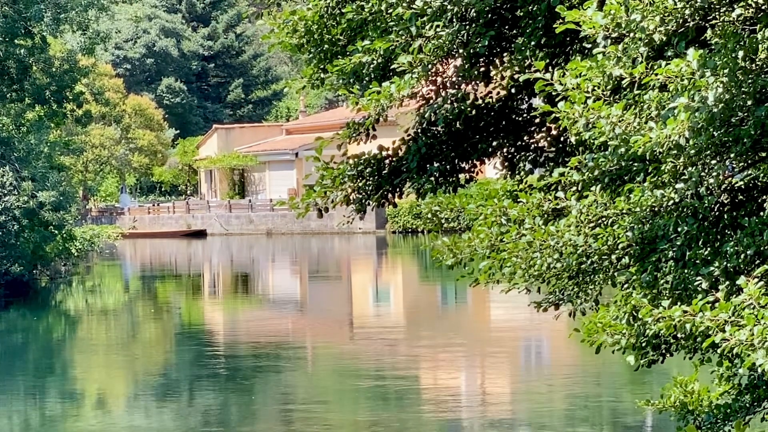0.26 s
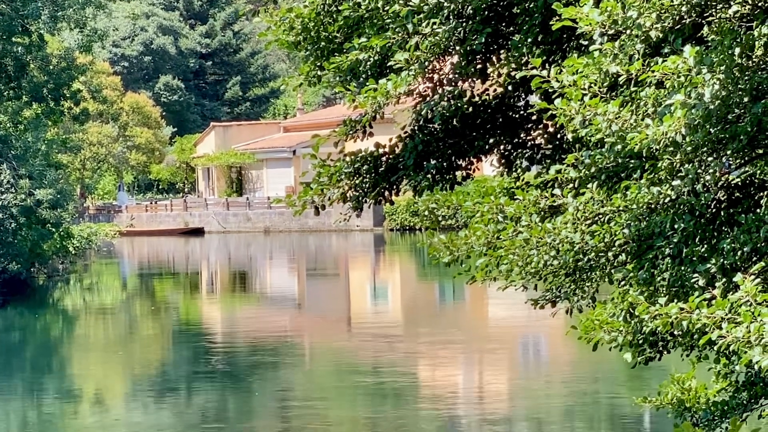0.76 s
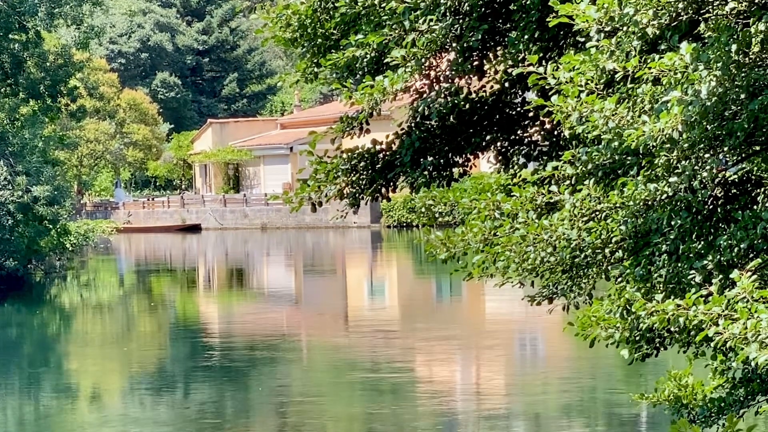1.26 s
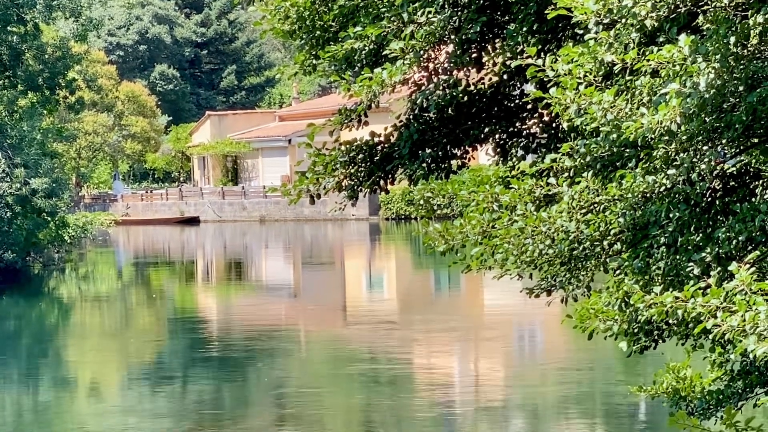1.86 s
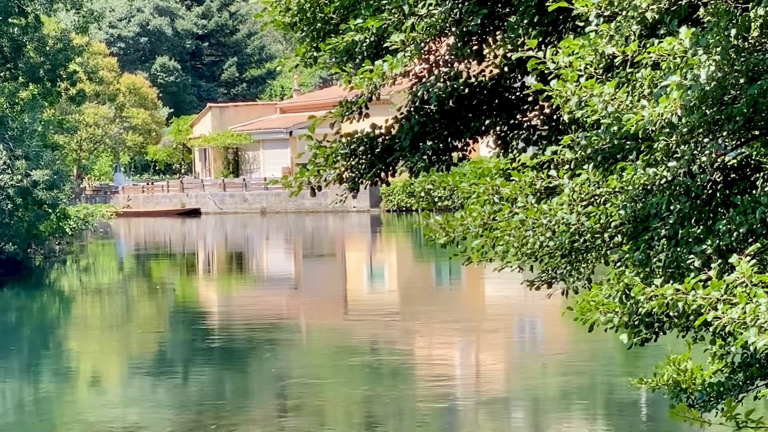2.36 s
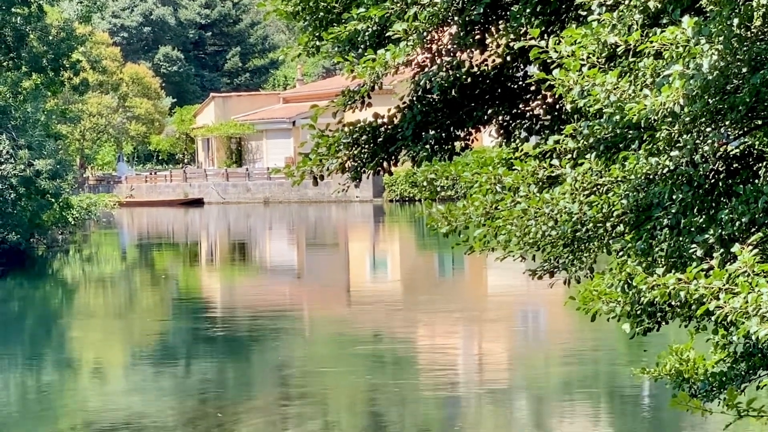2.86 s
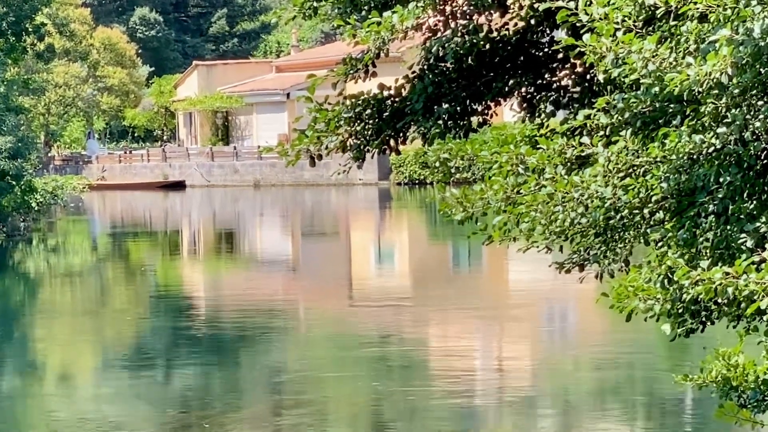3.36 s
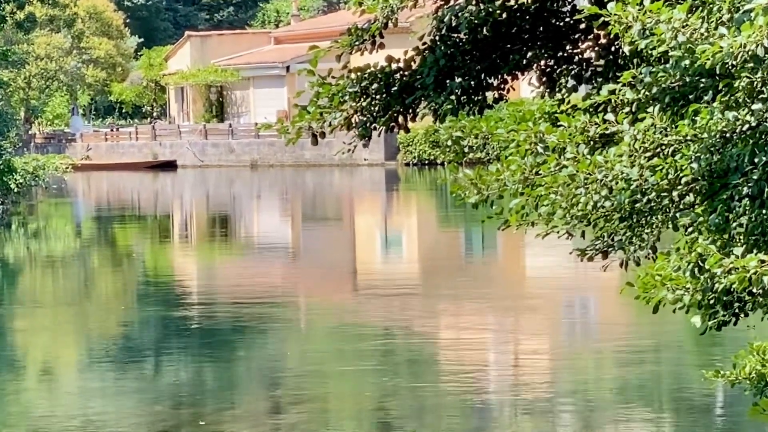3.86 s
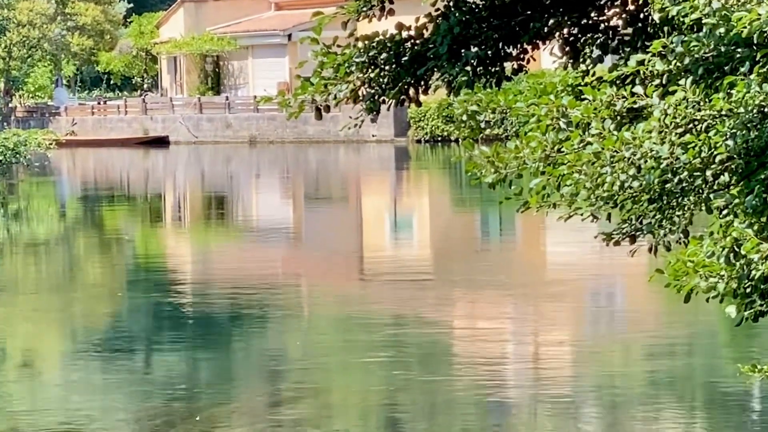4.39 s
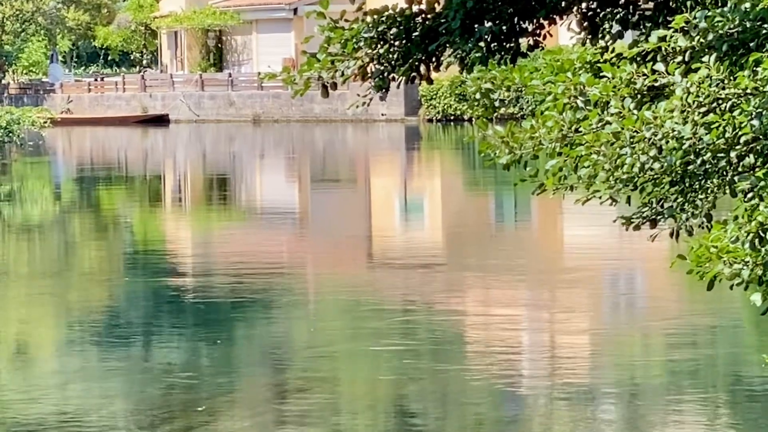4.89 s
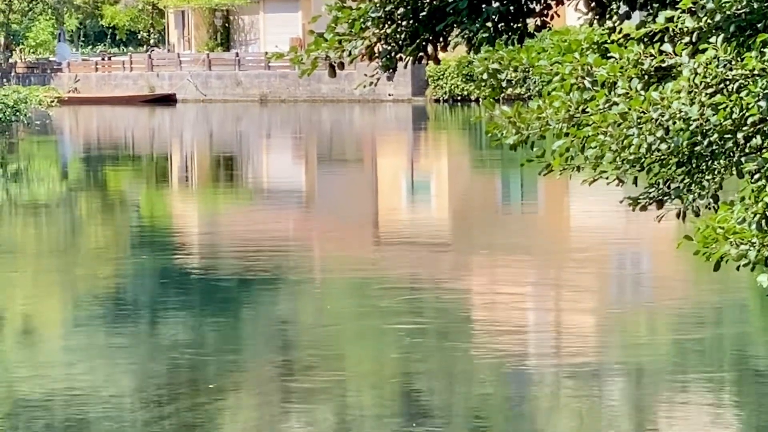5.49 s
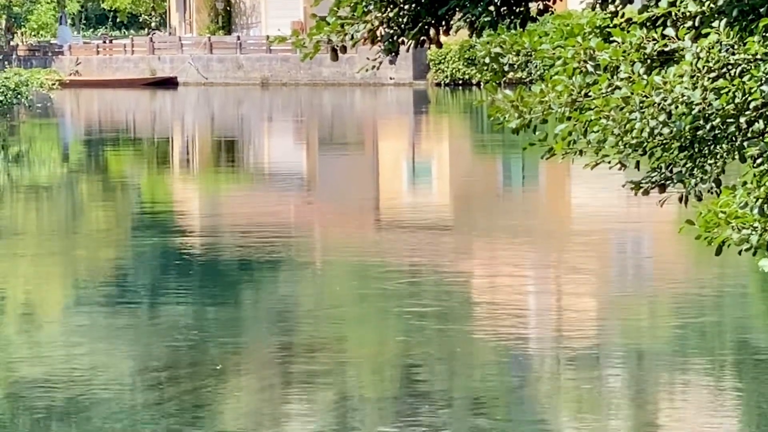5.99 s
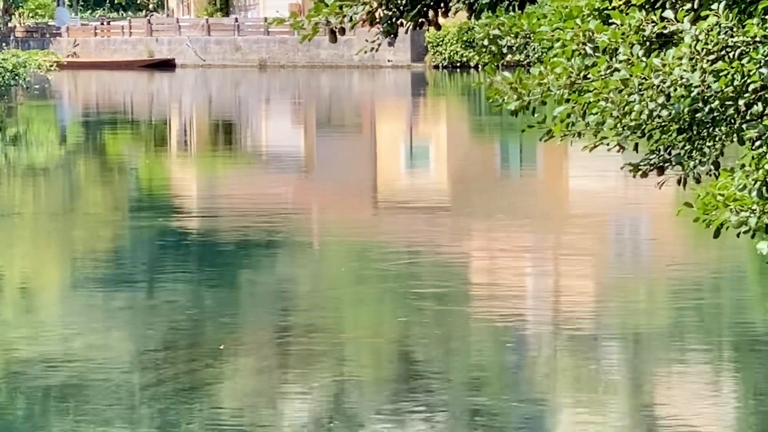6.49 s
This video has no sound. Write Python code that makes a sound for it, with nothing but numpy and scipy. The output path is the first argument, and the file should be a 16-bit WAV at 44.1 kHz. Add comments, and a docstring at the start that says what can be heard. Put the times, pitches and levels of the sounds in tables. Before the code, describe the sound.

A warm open-air river bank with trees, heard in stereo by two close microphones. From 0 to about 6.7 seconds cicadas rasp continuously: a near one chirps roughly seven times a second, slightly uneven, bright and dry around 4 to 8 kHz, with a duller one in step, throbbing neighbours and a hissing far chorus. Beneath lies soft, wide water noise. From the start a distant engine drones low under throttle, rising slightly until about 2.7 seconds and beating against a steadier second engine, with far tyre rush. Thin, short bird chips around 3 kHz appear between 0.2 and 1.4 seconds; a faint engine whine, clearest near 0.5 seconds, is gone by 2. By 3 seconds the throttle has eased; the drone turns duller and sinks steadily in pitch, most clearly after 4 seconds. Tyre rush swells briefly near 3.4, then fades. Rumble and cicadas continue to the end.

```python
"""Cicadas rasp in trees along a river throughout: a close one chirps about seven times a second over a far chorus.
From the start a distant engine drones under throttle, beating against a steadier one, over river and tyre noise.
A small bird chips in the first second and a half; a thin engine whine is gone by about two seconds.
By three seconds the throttle has eased and the drone sinks in pitch to the end; the tyre rush fades late.
Clicks make the near cicadas, harmonics the engines, shaped noise the rest; two close microphone ports hear it."""
import sys
import numpy as np
from scipy import signal
from scipy.fft import rfft, irfft
from scipy.io import wavfile

SR = 44100
rng = np.random.default_rng(int(sys.argv[2]) if len(sys.argv) > 2 else 0)


def dump_mix(stems):
    """Bounce the given channels to the path in sys.argv[1] as a 16-bit WAV at rate SR."""
    frames = np.atleast_2d(stems).T  # one column per channel
    limited = np.clip(frames, -1, 1)  # hard clip at full scale
    pcm = np.round(limited * 32767).astype(np.int16)
    wavfile.write(sys.argv[1], SR, pcm)


N = 297234
TIME = np.arange(N) / SR
HZ = np.fft.rfftfreq(N, 1 / SR)


def gain_of(db):
    """Decibels to amplitude."""
    return 10 ** (np.asarray(db) / 20)


def evened(x):
    """Scales to rms 1."""
    return x / np.sqrt(np.mean(x ** 2) + 1e-20)


def curve(rows):
    """A time table at every sample."""
    return np.interp(TIME, *np.transpose(rows))


def read(points):
    """A frequency table at every bin, on a log axis."""
    f, value = np.transpose(points)
    return np.interp(np.log(HZ + 1), np.log(f), value)


def drift(rate_hz, size=16384):
    """Slow chance of rms 1, up to about rate_hz."""
    hz = np.fft.rfftfreq(size, TIME[-1] / size)
    spectrum = rfft(rng.standard_normal(size))
    slow = irfft(spectrum / (1 + (hz / rate_hz) ** 4))
    return evened(np.interp(TIME, np.linspace(0, TIME[-1], size), slow))


def white_pair():
    """Two unrelated white noises."""
    return rng.standard_normal((2, N))


def ports(pair, colour, likeness, lead_rad=0):
    """Colours two unrelated signals and blends them into what the left and right ports hear, rms 1."""
    a, b = rfft(pair) * gain_of(read(colour))
    same = np.clip(read(likeness), 0, 1)
    blend = same * a + np.sqrt(1 - same ** 2) * b
    right = blend * np.exp(-1j * lead_rad)
    return evened(irfft(np.array([a, right]), N))


def foliage(x, t60_s, direct, count=6):
    """A direct path plus scatter from swaying leaves, its echo pattern always changing; two copies."""
    t = TIME[:SR // 3]
    tails = rng.standard_normal((count, 2, len(t))) * 10 ** (-3 * t / t60_s)
    tails /= np.linalg.norm(tails, axis=2, keepdims=True)
    shares = np.array([drift(4.8) for _ in tails])
    shares /= np.linalg.norm(shares, axis=0)
    out = np.zeros((2, N))
    for share, tail in zip(shares, tails):
        out += signal.oaconvolve((x * share)[None], tail, axes=1)[:, :N]
    # only the first copy holds the direct path
    return np.array([evened(out[0] + direct * x), evened(out[1])])


def tymbals(effort, clicks_hz, jitter, rasp_db, rasp_hz):
    """A quick, uneven run of clicks from buckling ribs, as strong as the effort and bunched into a rasp."""
    turns = np.cumsum(clicks_hz * (1 + jitter * drift(200))) / SR
    clicks = np.diff(np.floor(turns), prepend=0)
    return effort * gain_of(rasp_db * drift(rasp_hz)) * clicks


# Likeness of the ports. Each row: frequency in Hz, likeness 0-1.
CICADA_LIKENESS = [(1800, .5), (2300, .74), (2900, .99), (4000, .98), (5400, .9), (5770, .98), (6100, .89),
                   (7500, .83), (10500, .6), (11200, 1)]
# Phase lead of the left port. Each row: frequency in Hz, lead in radians.
CICADA_LEAD = [(2000, .5), (2500, -.05), (4000, -.05), (4350, -.5), (5550, -1.1), (5770, -3.1),
               (5880, -4.5), (6200, -6.2), (6900, -7.7), (8300, -8.6), (10700, -7.3), (11200, -2 * np.pi)]


def cicada_ports(pair, colour):
    """Stereo image of the cicadas: likeness and phase by frequency, the ports alike at the very top."""
    return ports(pair, colour, CICADA_LIKENESS, read(CICADA_LEAD))


# Close cicada, nearly even with a hitch now and then. Each row: mark in seconds, relative level in dB.
CHIRPS = [(.039, 0.5), (.2, 3.5), (.384, 4), (.565, 4.5), (.692, 1.5), (.846, 2.5), (.995, -0.5),
          (1.09, -6.5), (1.214, 0), (1.321, -1.5), (1.457, 2.5), (1.611, 4.5), (1.755, 2.5), (1.893, 0),
          (1.99, -2), (2.112, -0.5), (2.24, -0.5), (2.353, -1.5), (2.44, -4.5), (2.56, 1.5), (2.756, 3.5),
          (2.943, -0.5), (3.078, 1.5), (3.236, 2), (3.395, 2), (3.53, 2), (3.7, 2.5), (3.861, 0),
          (4.028, 1), (4.17, -2), (4.294, 3), (4.426, 1), (4.575, 2.5), (4.735, 1), (4.859, -0.5),
          (4.988, 1), (5.135, 0.5), (5.36, -1), (5.47, -4.5), (5.563, -3), (5.675, 1), (5.833, 2.5),
          (5.972, -1), (6.122, 2), (6.33, 3), (6.455, -2), (6.62, -1)]


def chirp_effort(rise_s, fall_s, lead_s):
    """About seven chirps a second, cresting lead_s before the mark, each dying away slower than it swells."""
    effort = np.zeros(N)
    for mark_s, db in CHIRPS:
        t = TIME - mark_s + lead_s
        width_s = np.where(t < 0, rise_s, fall_s)
        effort += gain_of(db) * np.exp(-np.minimum((t / width_s) ** 2, 20))
    return effort


# The nearest cicada loses least treble on its way. Each row: frequency in Hz, density in dB per Hz.
NEAR_COLOUR = [(1600, -32), (2250, -6.5), (3600, -8.5), (4400, 5), (5300, 1), (6200, 2), (7200, 3.5),
               (8400, -3), (10300, -9.5), (11200, -19.5), (12700, -15.5), (15000, -21)]


def close_cicada():
    """Tymbal clicks in chirps, a direct part within a stronger, short leaf scatter."""
    effort = chirp_effort(rise_s=0.037, fall_s=0.051, lead_s=0.01)
    clicks = tymbals(effort, clicks_hz=901, jitter=.3, rasp_db=0.8, rasp_hz=200)
    return gain_of(-59.5) * cicada_ports(foliage(clicks, t60_s=0.07, direct=0.72), NEAR_COLOUR)


# Colour of the duller chirps. Each row: frequency in Hz, density in dB per Hz.
DULLER_COLOUR = [(1700, -21), (2250, -6), (3000, -19), (3700, -21), (4300, 0), (4850, 2.5), (5100, -14),
                 (5450, 2.5), (7000, -20), (12000, -32)]


def duller_chirps():
    """A duller layer of the same chirps, in step with the close cicada: slower clicks, longer leaf scatter."""
    effort = chirp_effort(rise_s=0.042, fall_s=0.053, lead_s=0.015)
    clicks = tymbals(effort, clicks_hz=419.0, jitter=.4, rasp_db=2, rasp_hz=120)
    return gain_of(-60) * cicada_ports(foliage(clicks, t60_s=0.15, direct=1.0), DULLER_COLOUR)


# Neighbouring cicadas.
# Each row: ring in Hz, width in Hz, chirps per second, clicks per second, level in dB.
NEIGHBOURS = [(4347, 500, 5.1, 470, -62), (4685, 560, 4.7, 560, -59), (4910, 480, 12.5, 510, -60.5),
              (5400, 510, 5.4, 610, -63.5), (6380, 1200, 11, 530, -67)]
NEIGHBOUR_SWING_DB = 4


def neighbour(ring_hz, width_hz, chirps_per_s, clicks_hz, db):
    """One cicada's throbbing clicks, ringing in its hollow abdomen."""
    beat = np.cumsum(chirps_per_s * (1 + 0.202 * drift(3.03))) / SR + rng.random()
    effort = gain_of(NEIGHBOUR_SWING_DB * np.cos(2 * np.pi * beat))
    clicks = tymbals(effort, clicks_hz, jitter=.3, rasp_db=2, rasp_hz=90)
    ring = signal.iirpeak(ring_hz, ring_hz / width_hz, fs=SR)
    rung = signal.lfilter(*ring, signal.lfilter(*ring, clicks))
    return gain_of(db) * evened(rung)


def neighbours():
    """The neighbours summed, each at its own pitch and beat, scattered by leaves."""
    others = sum(neighbour(*row) for row in NEIGHBOURS)
    flat = [(1, 0)]
    return np.std(others) * cicada_ports(foliage(others, t60_s=.12, direct=1.0), flat)


# Chorus colour from tymbal and hollow abdomen. Each row: frequency in Hz, density in dB per Hz.
CHORUS_COLOUR = [(1500, -60), (1850, -20), (2300, -7), (2700, -13.8), (3100, -13.5), (3600, -19.5),
                 (4300, -4.5), (4750, -1.5), (5200, -2.5), (6200, -8.5), (7200, -7.2), (8300, -14),
                 (10200, -19.5), (13000, -32.5)]


def chorus():
    """Clicks of many cicadas merged into a hiss: shaped noise."""
    return gain_of(-52.0) * cicada_ports(white_pair(), CHORUS_COLOUR)


# Deeper-voiced, farther cicadas. Each row: frequency in Hz, density in dB per Hz.
DEEP_COLOUR = [(1600, -42), (2050, 0), (2400, -2.5), (2700, -0.5), (3000, -1), (3300, -5), (3700, -9),
               (4300, -34)]
# Each row: time in seconds, level in dB.
DEEP_DB = [(0, -68), (.5, -68), (.9, -66), (1.4, -69.5), (2, -69), (3, -70), (4.5, -71), (6.74, -69)]


def deep_chorus():
    """Lower-pitched shaped noise whose level wanders."""
    return gain_of(curve(DEEP_DB)) * cicada_ports(white_pair(), DEEP_COLOUR)


def cicadas():
    """All singers, close and far."""
    return close_cicada() + duller_chirps() + neighbours() + chorus() + deep_chorus()


def exhaust(firing_hz, levels_db, waver_rad, flutter_db, smear_rad):
    """One puff per firing, as harmonics nearly in step; moving air shakes their phase and strength."""
    turns = np.cumsum(firing_hz) / SR + rng.random()
    out = np.zeros(N)
    for order, db in enumerate(levels_db, 2):
        offset = smear_rad * rng.standard_normal() + waver_rad * drift(8.0)
        phase = 2 * np.pi * order * turns + offset
        out -= np.sqrt(2) * gain_of(db + flutter_db * drift(15.3)) * np.cos(phase)
    return out


# Single harmonics boom out or fade, several at times together.
# Each row: start in seconds, end in seconds, harmonic number, change in dB.
SWELLS = [(.12, 0.28, 3, 2.5), (.44, 0.623, 3, -3.5), (0.21, .62, 6, -8), (0.47, 0.77, 5, 1),
          (1.27, 2.04, 2, -7.5), (1.62, 3.05, 3, -5), (1.8, 1.99, 5, 4.5), (2.36, 2.926, 2, 5.5),
          (2.353, 2.8, 3, -5), (2.26, 2.67, 7, 5), (2.25, 2.65, 6, 5.5), (2.55, 3.12, 4, -7),
          (4.1, 4.36, 4, -14), (4.28, 4.6, 5, 6), (2.84, 3.24, 5, 4), (3.15, 3.5, 3, 8),
          (2.9, 3.35, 4, 6.5), (3, 3.46, 2, 5), (3.57, 3.777, 3, 8.5), (3.55, 4.097, 5, 6.5),
          (3.8, 4.077, 4, 6.5), (3.904, 3.99, 3, 9), (4.09, 4.236, 3, 7), (4.41, 4.53, 3, 4.5),
          (5.68, 7, 5, 13.5), (6.22, 6.6, 4, 5), (6.62, 7, 5, 7), (6.3, 7, 6, 9), (6.597, 7, 3, -6)]
SWELL_EDGE_S = 0.11


def swell(order):
    """One harmonic's change in dB, halfway at start and end; the briefest do not reach their full change."""
    change_db = np.zeros(N)
    for start_s, end_s, number, db in SWELLS:
        if round(number) == order:
            inside_s = np.minimum(TIME - start_s, end_s - TIME)
            change_db += db * np.clip(inside_s / SWELL_EDGE_S + .5, 0, 1)
    return change_db


# Engine speed. Each row: time in seconds, firings per second.
FIRING = [(0, 51.0), (.5, 52.4), (1.0, 53.8), (1.4, 54.5), (2.7, 55.0), (3.15, 54.0), (4.0, 51.4),
          (4.5, 48.2), (5.5, 41.2), (6.0, 38.3), (6.74, 35.7)]
# The driver eases off. Each row: time in seconds, throttle 0-1.
THROTTLE = [(0, 0.97), (.9, 0.92), (1.35, 0.75), (1.85, 0.64), (2.25, 0.29), (2.6, 0.45), (3, 0.07),
            (4.3, 0.29), (5.2, 0.05), (6.74, 0.1)]
# Harmonics from the second upward. Each row: level coasting in dB, level at full throttle in dB.
HARMONICS = [(-55.5, -44.5), (-48.5, -47), (-59.5, -47), (-65.5, -46.5), (-76.5, -52.5), (-75, -51)]


def drone():
    """Exhaust harmonics that brighten with throttle and follow the engine speed."""
    levels_db = []
    for order, (coasting_db, full_db) in enumerate(HARMONICS, 2):
        throttled_db = coasting_db + (full_db - coasting_db) * curve(THROTTLE)
        levels_db.append(throttled_db + swell(order))
    return exhaust(curve(FIRING), levels_db, waver_rad=0.2, flutter_db=1.2, smear_rad=0.81)


# Second engine's speed. Each row: time in seconds, firings per second.
SECOND_FIRING = [(0, 51.06), (3.0, 51.06), (4.0, 49.8), (5.2, 47)]
# Its harmonics from the second upward. Each entry: level in dB, before the time curve.
SECOND_HARMONICS_DB = [-53.5, -50, -57, -55, -61.5]
# Each row: time in seconds, level change in dB.
SECOND_DB = [(0, -2.5), (.65, -14), (.9, -2.5), (1.9, -1), (2.4, -8.5), (2.8, -11), (3.15, -2), (3.5, -6.5),
             (4.3, -21), (5.2, -20)]


def second_engine():
    """A steadier exhaust close in pitch, so that its harmonics beat with the drone's."""
    levels_db = [db + curve(SECOND_DB) for db in SECOND_HARMONICS_DB]
    return exhaust(curve(SECOND_FIRING), levels_db, waver_rad=0.35, flutter_db=2.0, smear_rad=1.94)


# Likeness of the ports for engine, river and tyre noise. Each row: frequency in Hz, likeness 0-1.
LOW_LIKENESS = [(100, 0.99), (350, 0.98), (540, 0.83), (780, 0.3), (1150, 0.05), (1700, 0.37), (3000, 1),
                (11000, 1)]
# Exhaust rumble. Each row: frequency in Hz, density in dB per Hz.
RUMBLE_COLOUR = [(20, -41), (31, -28), (38, -6), (45, -4), (60, 4), (76, 4.5), (120, -0.5), (180, 1),
                 (250, -12), (330, -19), (500, -47)]
# Each row: time in seconds, level in dB.
RUMBLE_DB = [(0, -48.5), (1.8, -49.5), (2.6, -47.5), (3.3, -48.5), (4.6, -48), (5.4, -47.5), (6.1, -46),
             (6.74, -45.5)]


def rumble():
    """Low shaped noise of the exhaust."""
    return gain_of(curve(RUMBLE_DB)) * ports(white_pair(), RUMBLE_COLOUR, LOW_LIKENESS)


# Gas roar. Each row: frequency in Hz, density in dB per Hz.
ROAR_COLOUR = [(100, -28), (170, -5), (240, 0), (330, -7), (420, -2.5), (600, -19), (1200, -46)]


def roar():
    """Gas roaring out of the exhaust: noise in proportion to throttle."""
    return gain_of(-58.5) * curve(THROTTLE) * ports(white_pair(), ROAR_COLOUR, LOW_LIKENESS)


THROB_HZ = 36
# Each row: time in seconds, level in dB.
THROB_DB = [(0, -59), (1.2, -57), (2.4, -60), (2.9, -58), (3.4, -65), (3.9, -54), (4.35, -57), (4.7, -68),
            (5.1, -59), (5.5, -66), (6.74, -73)]


def throb():
    """A low sine under the engines, its phase drifting."""
    phase = 2 * np.pi * THROB_HZ * TIME + 0.99 * drift(5.1)
    return np.sqrt(2) * gain_of(curve(THROB_DB)) * np.sin(phase)


def engine():
    """Both exhausts and the noise beneath, the right port ahead by one phase at every frequency."""
    lead_rad = 0.23
    left, right = drone() + second_engine() + rumble() + roar() + throb()
    return np.array([left, irfft(rfft(right) * np.exp(1j * lead_rad), N)])


# River and valley. Each row: frequency in Hz, density in dB per Hz.
RIVER_COLOUR = [(20, -23), (100, -20), (250, 0), (400, -1), (540, -1), (700, -5), (1000, -8), (1300, -14),
                (1700, -20), (3000, -30), (8000, -43), (15000, -69)]


def river():
    """Soft, wide water noise with a slightly wandering level."""
    level_db = -56.5 + 0.64 * drift(11.5)
    return gain_of(level_db) * ports(white_pair(), RIVER_COLOUR, LOW_LIKENESS)


# Far tyres. Each row: frequency in Hz, density in dB per Hz.
TYRE_COLOUR = [(200, -2.5), (500, -9), (900, 1), (1200, -2), (1700, -13.5), (3000, -39), (8000, -58)]
# Each row: time in seconds, level in dB.
TYRE_DB = [(0, -65.5), (.7, -63), (1.4, -64.5), (2.3, -63), (3, -66.5), (3.38, -61.5), (3.7, -66.5),
           (4.5, -71.5), (6.74, -72)]


def tyres():
    """A far rush of shaped noise, fading late."""
    return gain_of(curve(TYRE_DB)) * ports(white_pair(), TYRE_COLOUR, LOW_LIKENESS)


WHINE_ORDER = 17  # multiple of the firing rate
# Each row: time in seconds, peak level in dB.
WHINE_DB = [(.1, -72), (.33, -67), (.42, -61), (.7, -60.5), (.77, -67), (1.1, -67), (1.2, -74), (1.8, -75),
            (2.1, -100)]


def whine():
    """A thin engine tone locked to its speed, its phase drifting separately at each port."""
    phase = 2 * np.pi * WHINE_ORDER * np.cumsum(curve(FIRING)) / SR
    tones = np.array([np.sin(phase + 0.57 * drift(17)) for _ in range(2)])
    return tones * gain_of(curve(WHINE_DB))


# Bird notes.
# Each row: start in seconds, length in seconds, start in Hz, end in Hz, level in dB before the leaf scatter.
BIRD = [(.163, 0.046, 3530, 3360, -61.5), (.368, .028, 3070, 3055, -61), (0.41, 0.029, 3020, 3025, -61),
        (.752, .075, 3480, 3020, -61), (1.093, 0.084, 3110, 2990, -62), (1.165, .028, 3020, 3040, -63),
        (1.205, .036, 3020, 2975, -62), (1.32, .09, 3420, 3445, -64.5)]


def bird():
    """Thin, quavering whistles that glide quickly towards an end pitch, smeared by the trees."""
    song = np.zeros(N)
    for start_s, length_s, start_hz, end_hz, db in BIRD:
        u = np.clip((TIME - start_s) / length_s, 0, 1)
        glide_hz = end_hz + (start_hz - end_hz) * np.exp(-3.5 * u)
        hz = glide_hz + 15 * drift(71)
        envelope = np.sqrt(abs(np.sin(np.pi * u)))
        song += gain_of(db) * envelope * np.sin(2 * np.pi * np.cumsum(hz) / SR)
    return 1.23 * np.std(song) * foliage(song, t60_s=0.19, direct=2.2)[0]


def scene():
    """Everything heard from the river bank."""
    return cicadas() + engine() + river() + tyres() + whine() + bird()


# Recorder's treble roll-off. Each row: frequency in Hz, gain in dB.
ROLL_OFF = [(12800, 0), (13600, -1.5), (14300, -9), (15000, -8)]
# Colour difference of the ports. Each row: frequency in Hz, left minus right in dB.
PORT_BALANCE = [(60, 1.3), (99, 0.7), (160, 0.5), (270, 0.0), (440, -0.5), (730, 4), (1190, -3.5),
                (1970, 4.5), (3240, -1), (5330, 0.5), (8780, 0.0), (14400, 0)]


def record(dry):
    """The ports' colour, the recorder's soft top and its steep band limit."""
    eased = dry * signal.windows.tukey(N, .002)
    colour_db = read(ROLL_OFF) + np.outer([.5, -.5], read(PORT_BALANCE))
    soft = irfft(rfft(eased) * gain_of(colour_db), N)
    edge = signal.firwin(1023, 15080, window=("kaiser", 9), fs=SR)
    return signal.oaconvolve(soft, edge[None], "same")


dry = scene()
out = record(dry)
dump_mix(out)
```